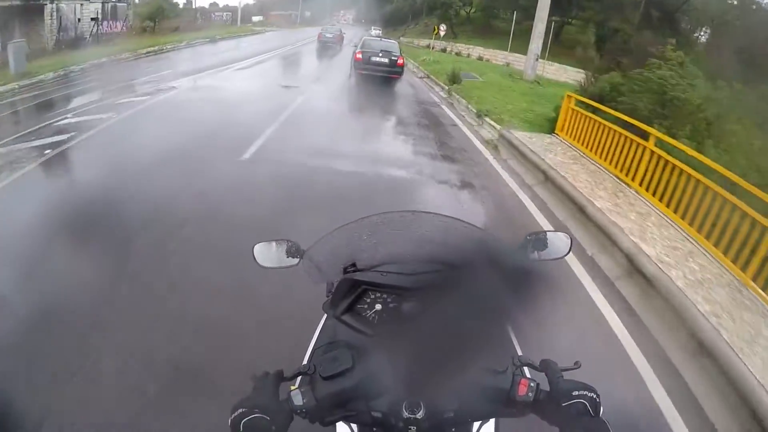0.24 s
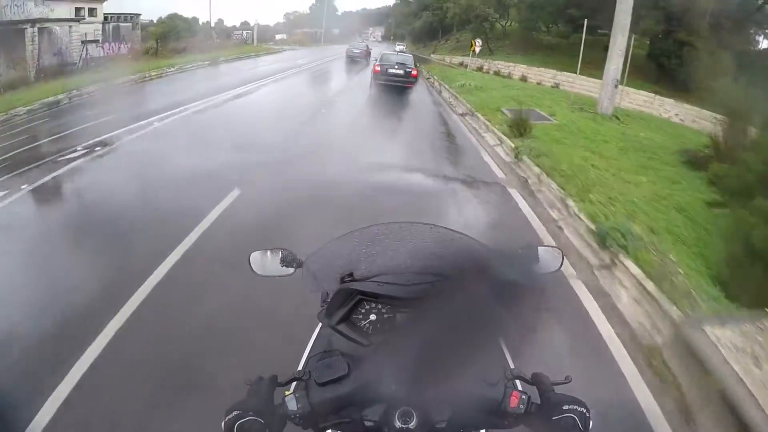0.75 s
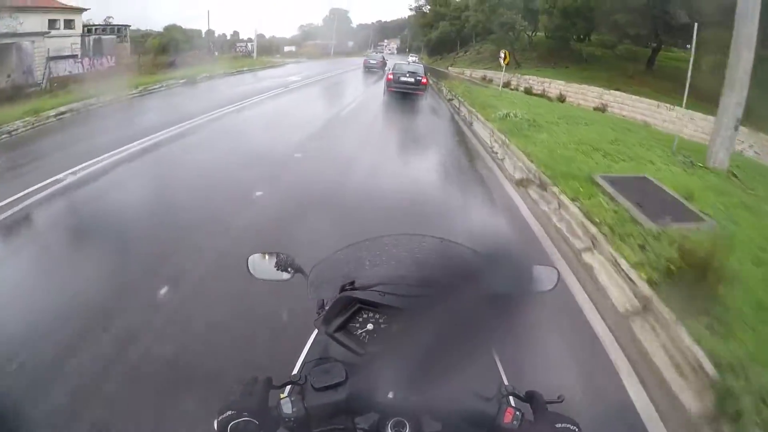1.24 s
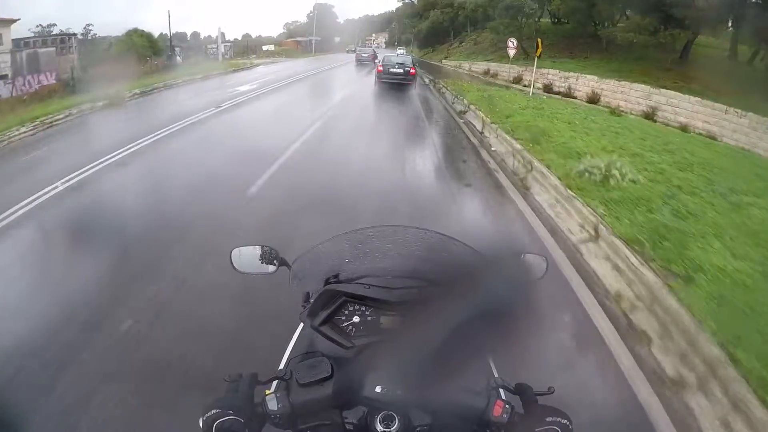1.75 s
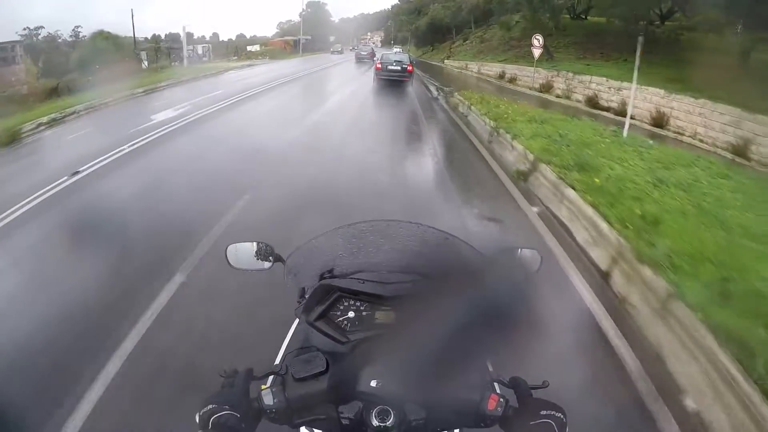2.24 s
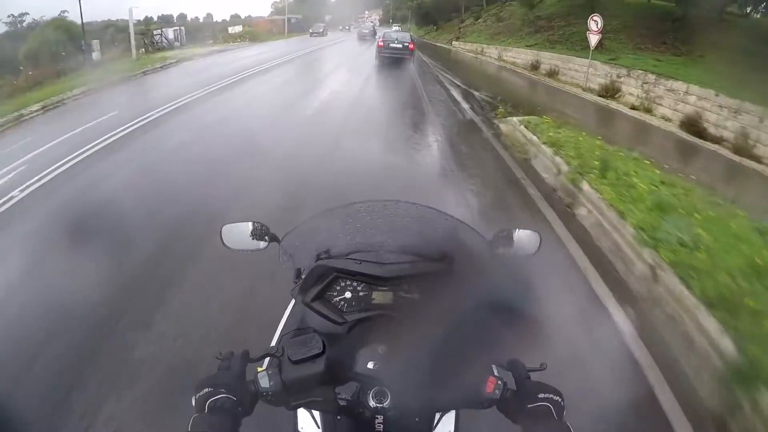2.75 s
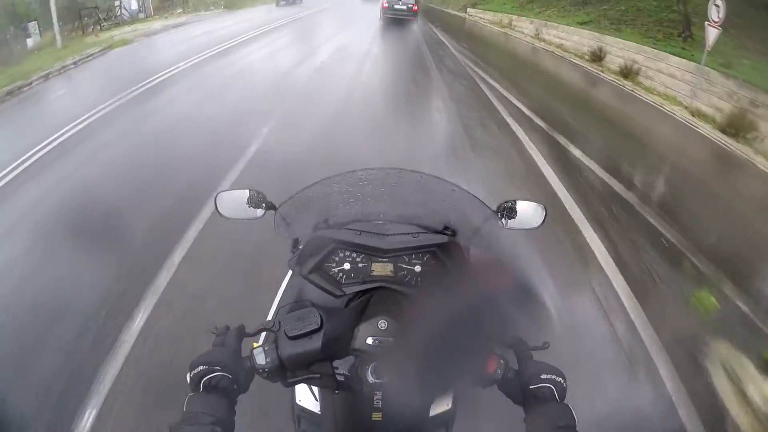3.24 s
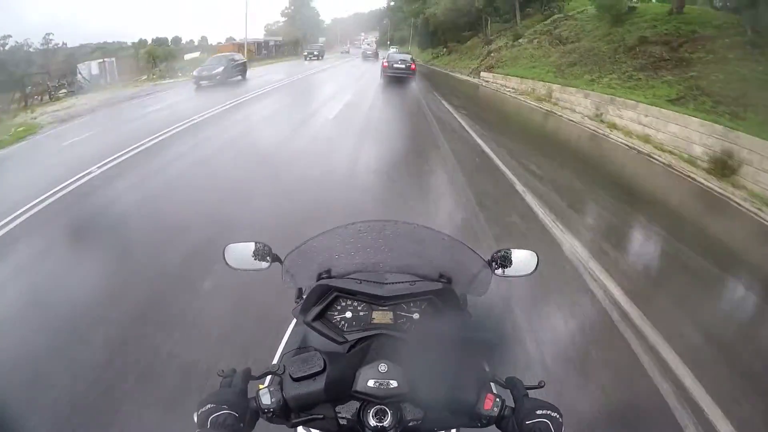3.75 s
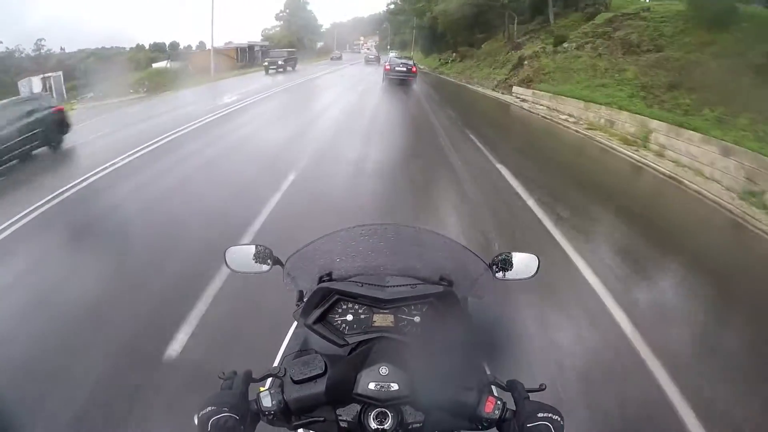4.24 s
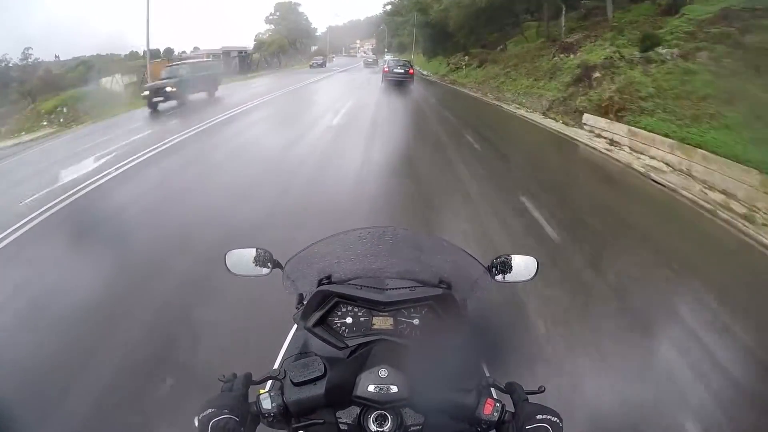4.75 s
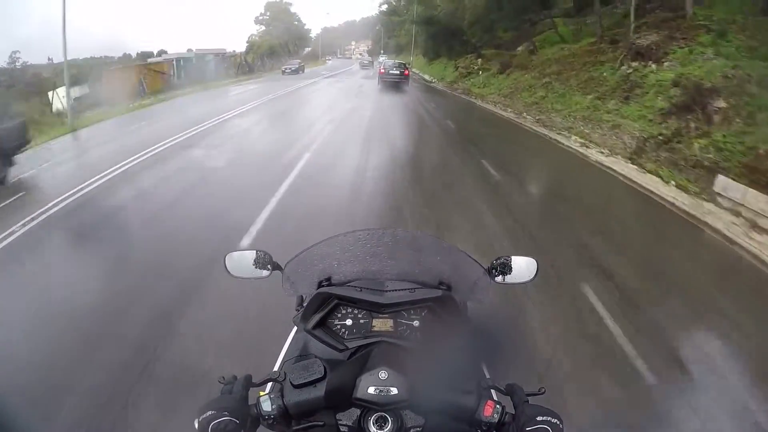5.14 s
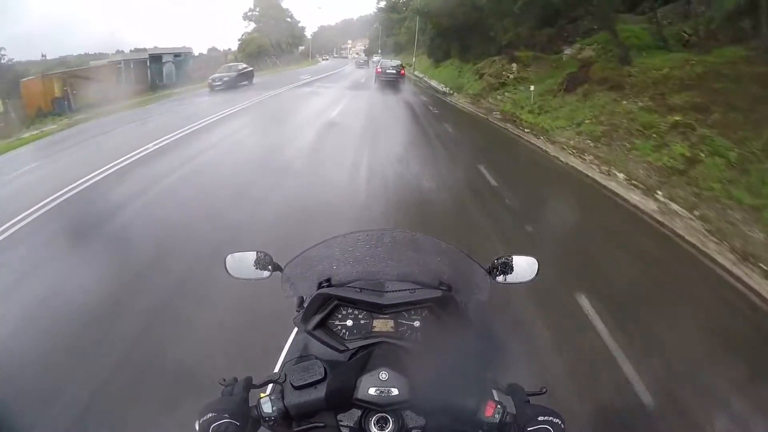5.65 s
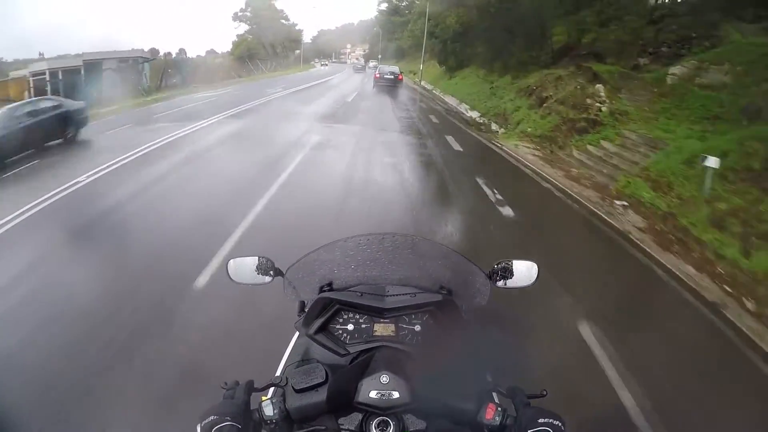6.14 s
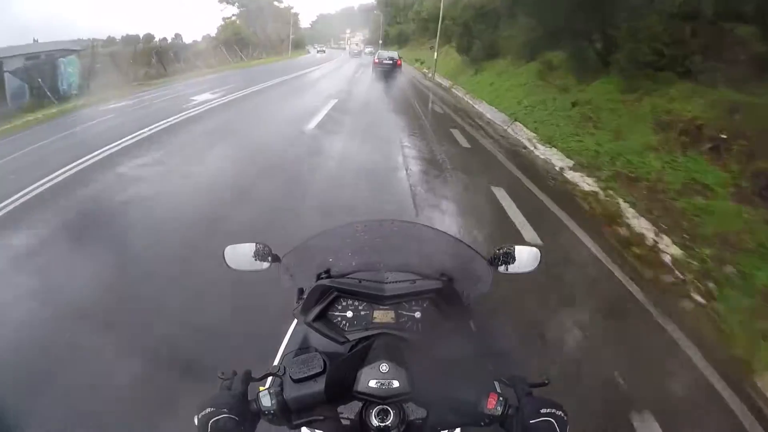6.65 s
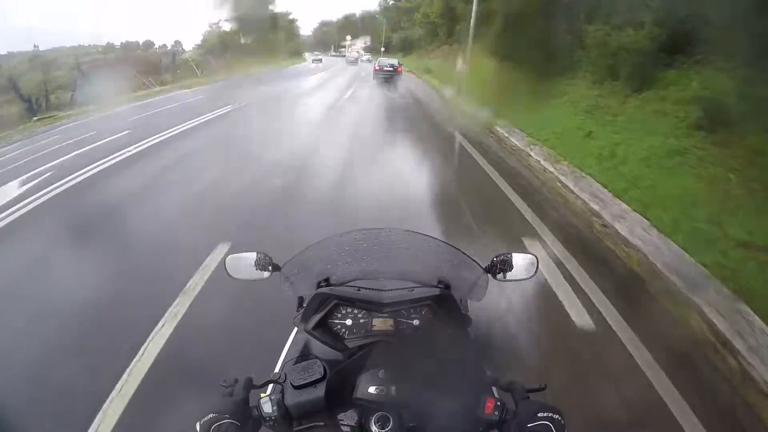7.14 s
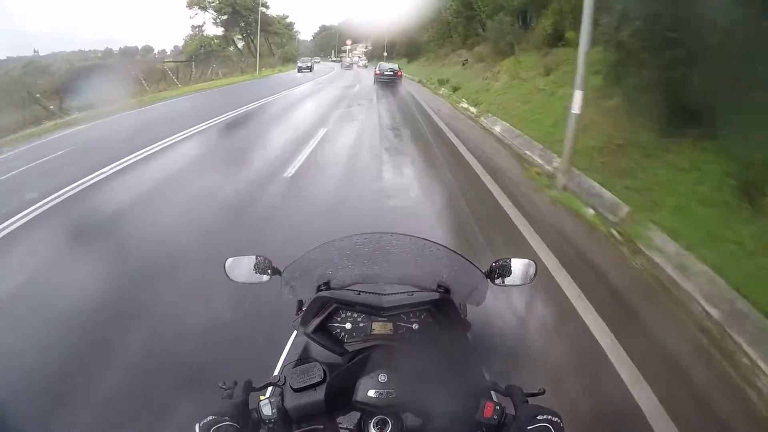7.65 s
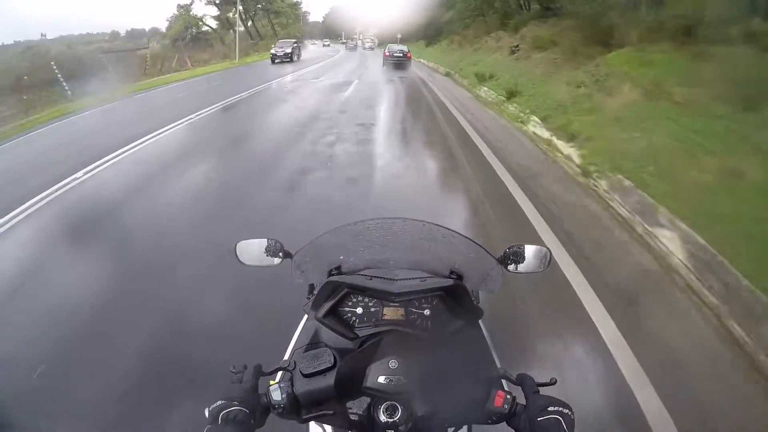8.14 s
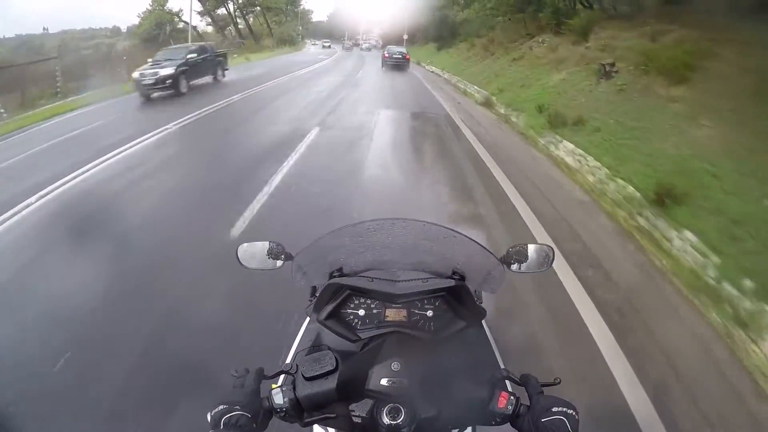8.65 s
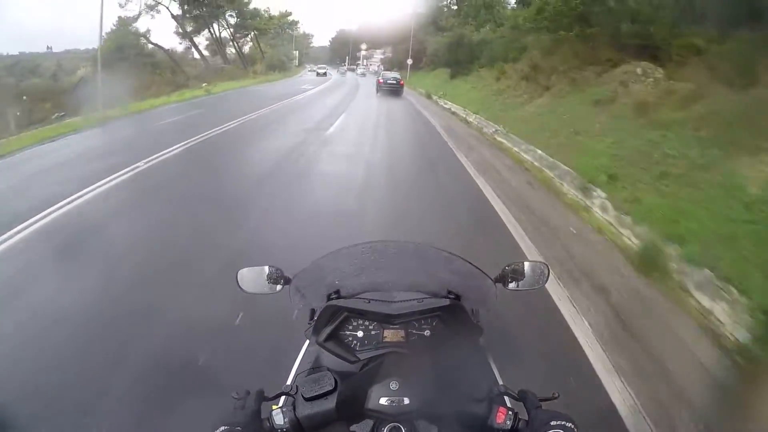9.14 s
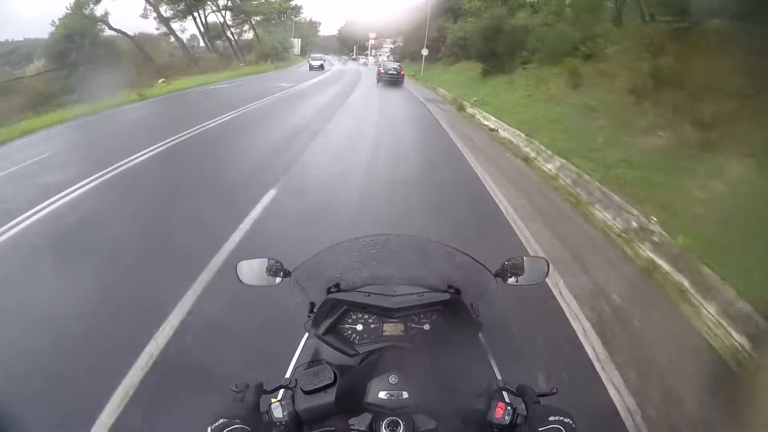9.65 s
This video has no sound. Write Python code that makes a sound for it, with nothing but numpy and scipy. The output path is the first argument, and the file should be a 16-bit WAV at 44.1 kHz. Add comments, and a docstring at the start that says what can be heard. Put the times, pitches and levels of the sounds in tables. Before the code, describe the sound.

On a rainy open road, a scooter pulls away from moderate speed to a steady cruise. Its deep drone and faint whine are gradually buried by gusty wind thumps, dull tyre roar and dense spray hiss. Irregular raindrops tap the plastic camera shell close up, and loud hits briefly push the whole sound down, with some clipping and distortion.

```python
"""A rush of wind and wet hiss swells as a scooter gathers speed in the rain; raindrops tick on a plastic shell.
The listener is a microphone in a housing on the rider's helmet. One rising airflow with gusts drives
the buffeting and the spray hiss, both made of patchy filtered noise; without the gusts it also drives the roar.
Sine orders make the engine drone and two gliding sines the drive whine; each heavy drop is a burst of noise
and decaying shell modes. Loud moments make the gain control duck, and what exceeds full scale clips."""
import sys
import numpy as np
from scipy import signal
from scipy.fft import rfft, irfft, next_fast_len
from scipy.io import wavfile
from scipy.ndimage import uniform_filter1d, minimum_filter1d, map_coordinates

SR = 44100
rng = np.random.default_rng(int(sys.argv[2]) if len(sys.argv) > 2 else 0)


def unload_audio(sound):
    """Save the sound as a 16-bit wav file, at the path given as the first command line argument."""
    columns = np.transpose(np.atleast_2d(sound))
    # keep every value between -1 and 1, then stretch to whole-number steps
    steps = np.round(np.clip(columns, -1, 1) * 32767)
    wavfile.write(sys.argv[1], SR, steps.astype(np.int16))


N = 436590


def amp(db):
    """Decibels to gain."""
    return 10 ** (np.asarray(db) / 20)


def unit(x):
    """Scale to rms 1."""
    return x / np.sqrt(np.mean(x ** 2) + 1e-20)


def curves(rows):
    """One value per sample for each column after the time."""
    s, *columns = np.transpose(rows)
    t = np.arange(N) / SR
    return [np.interp(t, s, column) for column in columns]


def wobble(rate):
    """A smooth random curve through normally distributed knots, rate knots a second."""
    coarse = np.linspace(0, N, num=N // 64)
    knots = rng.standard_normal(int(N * rate / SR) + 4)
    smooth = map_coordinates(knots, [coarse * rate / SR])
    return np.interp(np.arange(N), coarse, smooth)


def coloured(x, points):
    """x through a causal, minimum-phase filter whose gain follows (f/Hz, gain/dB) points."""
    m = 2 * next_fast_len(N // 2 + SR // 4)
    f, db = np.transpose(points)
    log_f = np.log(np.fft.rfftfreq(m, 1 / SR) + 1)
    log_gain = np.log(amp(np.interp(log_f, np.log(f), db)))
    # folding the cepstrum onto positive time makes the filter causal
    fold = np.r_[1, np.full(m // 2 - 1, 2), 1, np.zeros(m // 2 - 1)]
    cepstrum = irfft(log_gain, m) * fold
    response = np.exp(rfft(cepstrum))
    return irfft(rfft(x, m) * response, m)[:N]


def rush(points, patchy_db):
    """Turbulent noise of rms 1: its gain varies in patches of time and frequency."""
    z = signal.stft(rng.standard_normal(N), nperseg=512)[2]
    field = uniform_filter1d(rng.standard_normal(z.shape), size=7, axis=0)
    field = uniform_filter1d(field, size=12, axis=1)
    patchy = signal.istft(z * amp(patchy_db * unit(field)), nperseg=512)[1][:N]
    return unit(coloured(patchy, points))


def patter(rate, spread_db):
    """Random droplet impulses of clipped log-normal size and either sign, rate a second."""
    hits = rng.random(N) < rate / SR
    sizes = amp(spread_db * np.clip(rng.standard_normal(N), -2, 2))
    return hits * sizes * rng.choice([-1, 1], N)


def airflow():
    """Strength of the flow (dB) and the smooth gusts that add to hiss and buffeting (dB)."""
    # airflow rising with road speed: t/s, level/dB relative to cruising
    flow_course = [(0, -11.5), (.75, -10.5), (1.6, -9), (3, -6), (3.7, -6.5), (4.6, -4.5), (5.5, -2),
                   (6.3, -1.7), (7.2, 0.5), (7.9, -0.9), (9.9, -0.8)]
    # gusts (+) and lulls (-): middle t/s, length/s, hiss/dB, buffet/dB
    gusts = [(.6, 0.5, -1, -1), (1.5, 0.43, -0.5, 1.5), (1.753, 0.22, 2.5, -2), (3.3, .5, 1.5, -1),
             (3.56, 0.18, -2, -2), (3.951, .4, -1.5, 5), (4.299, 0.23, 0, -4), (4.75, .3, -1.5, -0.5),
             (5.448, 0.49, 2.5, 2.5), (5.92, 0.37, 0, -4), (7.394, 0.38, 1.5, 5), (8.058, .16, -3, -1),
             (8.2, 0.18, 2, 0.5), (8.6, 0.15, -4, -2), (9.04, 0.45, 2, 2.5), (9.24, .14, -1, 0.5),
             (9.382, 0.3, 3.5, 4.5), (9.8, 0.086, -4, 3), (9.881, .12, 3, 4)]
    flow, = curves(flow_course)
    t = np.arange(N) / SR
    hiss, buffet = np.zeros(N), np.zeros(N)
    for s, length, hiss_db, buffet_db in gusts:
        inside = np.abs(t - s) < length / 2
        swell = np.cos(np.pi * (t[inside] - s) / length) ** 2
        hiss[inside] += hiss_db * swell
        buffet[inside] += buffet_db * swell
    return flow, hiss, buffet


def swish():
    """The tyres throw water off the wet road with a smooth, high hiss."""
    # course of the swish: t/s, level/dB
    swish_course = [(0, -51), (2.6, -47.5), (3.6, -62), (9.9, -63.5)]
    # its spectrum: f/Hz, density/dB per Hz
    wet_spectrum = [(3000, -28), (4600, -0.5), (5800, -9), (7200, -3.5), (8600, -13), (9700, -7),
                    (11000, -15), (13200, -16), (15000, -26)]
    db, = curves(swish_course)
    return amp(db) * rush(wet_spectrum, patchy_db=1.3)


def drizzle(flow, prick_db=-57, tick_db=-50, growth=1.55, tick_t60=0.0053):
    """Light drops land at random, as bright pinpricks and fewer tiny splashes; speed makes them hit harder."""
    # colour of the light drops: f/Hz, gain/dB
    pinprick_colour = [(2500, -30), (6000, -1), (10000, 1), (13000, -7), (15500, -4)]
    t = np.arange(SR // 50) / SR
    decay = amp(-60 * t / tick_t60)  # tick_t60 in s
    pricks = unit(coloured(patter(rate=16, spread_db=5), pinprick_colour))
    splashes = signal.fftconvolve(patter(rate=4, spread_db=2), decay)[:N] * rng.standard_normal(N)
    ticks = unit(coloured(splashes, pinprick_colour))
    return amp(growth * flow) * (amp(prick_db) * pricks + amp(tick_db) * ticks)  # growth in dB per dB of flow


def whistle():
    """The airflow whistles hoarsely across an edge of the housing: noise in a narrow band."""
    # course of the whistle: t/s, level/dB
    whistle_course = [(1.62, -62), (1.7, -29), (1.95, -37.5), (2.95, -32), (3.07, -27.5), (3.45, -28.5),
                      (3.52, -58)]
    # its spectrum: f/Hz, density/dB per Hz
    edge_spectrum = [(1800, -32), (2260, -1), (2390, 5.5), (2520, -3), (2720, -7.5), (3350, -4),
                     (4000, -47.5)]
    db, = curves(whistle_course)
    return amp(db) * rush(edge_spectrum, patchy_db=1)


def whine(jitter=0.004, flutter_db=4.0, second_ratio=.775, second_db=-5.0):
    """The transmission sings two thin, unsteady notes; the lower one comes in as speed builds."""
    # upper note, rising with road speed: t/s, f/Hz before jitter, peak level/dB before flutter
    whine_course = [(0, 924, -50), (.62, 1006, -47), (1.3, 1100, -51.5), (1.95, 1194, -50.5),
                    (2.45, 1270, -48.5), (3.5, 1400, -52), (5, 1478, -58)]
    hz, db = curves(whine_course)
    phase = 2 * np.pi * np.cumsum(hz * (1 + jitter * wobble(40))) / SR
    speed = (hz - hz.min()) / np.ptp(hz)
    upper = amp(flutter_db * wobble(20)) * np.sin(phase)
    # second_db, relative to the upper note, holds halfway up the glide
    lower = 2 * speed * amp(second_db + flutter_db * wobble(18)) * np.sin(second_ratio * phase)
    return amp(db) * (upper + lower)


def engine(jitter=0.002, flutter_db=1.76):
    """Exhaust orders on the firing rate; the note changes colour as the engine reaches cruising speed."""
    # course of the engine: t/s, firing rate f/Hz before jitter, rms level/dB of a 0 dB order
    engine_course = [(0, 53.13, -35), (.45, 54.83, -37), (1.4, 60.5, -35), (2.2, 64.54, -33.5),
                     (3.1, 67.5, -36.5), (4.3, 68.07, -34.5), (5.4, 66.74, -32), (7, 66.45, -33),
                     (9.9, 66.25, -32.5)]
    # exhaust orders: multiple of the firing rate, pulling away level/dB, cruising level/dB
    exhaust_orders = [(1, 1, 0.5), (2, -6.5, -13), (3, -8.5, -19.5), (4, -27, -19.5), (5, -18, -20),
                      (6, -35, -25), (8, -25.5, -23), (10, -29, -22.5)]
    hz, db = curves(engine_course)
    phase = 2 * np.pi * np.cumsum(hz * (1 + jitter * wobble(14))) / SR
    cruise = ((hz - hz.min()) / np.ptp(hz)) ** 2
    drone = np.zeros(N)
    for k, pulling, cruising in exhaust_orders:
        order_db = pulling + (cruising - pulling) * cruise + flutter_db * wobble(7)
        drone += amp(order_db) * np.sin(round(k) * phase + 2 * np.pi * rng.random())
    return amp(db) * np.sqrt(2) * drone


def road(flow, level_db=-33.5, growth=0.81, draught_db=-6.0, draught_growth=0.56):
    """The dull roar of tyres, and a low draught round the helmet that grows faster with speed."""
    # tyre roar: f/Hz, density/dB per Hz
    roar_spectrum = [(90, -39), (160, -2.5), (300, -2.5), (480, -3.5), (620, -4), (820, -2.5), (990, 2.5),
                     (1250, -1.5), (1600, 2), (3000, -37.5)]
    # helmet draught: f/Hz, density/dB per Hz
    draught_spectrum = [(100, -23.5), (165, 2.5), (235, -3.5), (305, -2.5), (335, 3), (370, 2.5), (405, 1),
                        (470, -5), (800, -37)]
    # draught_db is relative to the roar; the growths are dB per dB of flow
    draught = amp(draught_db + draught_growth * flow) * rush(draught_spectrum, patchy_db=2.1)
    roar = rush(roar_spectrum, patchy_db=0.5)
    return amp(level_db + growth * flow) * (roar + draught)


def spray(flow, gust, hiss_db=-21.5, hiss_growth=1.167, fine_db=-45, fine_growth=1.2,
          grain_db=-8, flutter_db=0.88, sway_db=0.64):
    """Air and fine water hiss on the shell with a dense patter of droplets, all growing with the flow."""
    # air hiss, also the colour of the droplets: f/Hz, density/dB per Hz
    air_spectrum = [(700, -30), (1300, -24), (1520, -11.5), (1730, 0), (2000, -2.5), (2400, 1.5),
                    (2620, -1), (2700, -3.5), (2900, -1.5), (3420, 0.5), (3950, -8), (4250, -12),
                    (4480, -18), (4950, -16.5), (5300, -26.5), (8000, -63)]
    # fine water fizz: f/Hz, density/dB per Hz
    spray_spectrum = [(3500, -23), (5000, -5), (5350, 6.5), (6000, 5), (6400, 0.5), (7000, 2.5),
                      (7500, 1.5), (8200, -8.5), (8900, -10), (9600, 4), (10600, -8), (12800, -23),
                      (15000, -32)]
    flutter = gust + flutter_db * wobble(30) + sway_db * wobble(7)
    grains = unit(coloured(patter(rate=600, spread_db=10.5), air_spectrum))
    body = rush(air_spectrum, patchy_db=1.0) + amp(grain_db) * grains
    fizz = rush(spray_spectrum, patchy_db=1.2)
    hiss = amp(hiss_db + hiss_growth * flow + flutter) * body
    return hiss + amp(fine_db + fine_growth * flow + flutter) * fizz


def wind(flow, gust, level_db=-24.0, growth=1.05, lump_db=1.5, sway_db=1.56,
         steadiness=0.64, boom_db=-1, boom_growth=0.44):
    """Eddies thump on the housing; a strong flow also sets off a low, hollow boom."""
    # eddies: f/Hz, density/dB per Hz
    rumble_spectrum = [(10, -11.5), (25, 4), (48, 1), (66, -6), (88, -1.5), (104, -4), (125, -11),
                       (155, -18), (220, -38), (400, -71)]
    # hollow boom: f/Hz, density/dB per Hz
    boom_spectrum = [(45, -37.5), (72, -12), (82, 5.5), (88, 7), (95, 1), (106, -7), (160, -56)]
    db = growth * flow + gust + sway_db * wobble(8)
    boom = amp(boom_db + boom_growth * np.minimum(db, 0)) * rush(boom_spectrum, patchy_db=1.5)
    eddies = rush(rumble_spectrum, patchy_db=1.0) + boom
    # dividing by part of the slow envelope evens out the thumps
    swell = np.sqrt(np.abs(uniform_filter1d(eddies ** 2, size=SR // 8)) + 1e-9)
    steadied = unit(eddies / swell ** steadiness)
    return amp(db + level_db + lump_db * wobble(25)) * steadied


def raindrops(splash_db=1, splash_t60=0.0055, attack=0.00028):
    """Each heavy drop bursts with a bright splash and rings the spot it hits along with the whole shell."""
    # heavy drops: t/s, ring f/Hz, knock level/dB, splash level/dB before splash_db,
    # shell thud level/dB relative to the ring
    drops = [(0.331, 3460, -12.5, -34.5, -26), (0.3973, 1980, -13, -21.5, -25),
             (0.422, 4400, -27, -37, -21), (0.6327, 1490, -22, -30.5, -14), (0.6409, 4000, -25, -30.5, -26),
             (0.7343, 2120, -18.5, -44, -17), (1.0372, 3090, -21.5, -48, -20),
             (1.2583, 2200, -25, -32, -28), (2.2634, 2137, -22, -32, -30),
             (2.3048, 3760, -11.5, -18.5, -27), (2.4304, 4870, -20, -23.5, -26),
             (3.0561, 2180, -16, -45, -25), (3.27, 2940, -20, -50, -31), (3.5354, 2000, -22.5, -29, -28),
             (5.0148, 4310, -34, -27.5, -26), (5.7516, 11300, -9, -18, -28), (5.755, 3570, -14.5, -20, -24),
             (5.8415, 4260, -39, -30, -26), (5.9717, 3300, -19.5, -30.5, -26),
             (6.2772, 13500, -24, -32, -18), (7.0412, 12000, -18.5, -27, -26),
             (7.1763, 3100, -12, -21, -25), (7.4428, 1940, 2.5, -8, -23), (7.9379, 2790, -5, -14, -20),
             (8.2056, 3490, -14, -26, -26), (8.7273, 3320, -0.5, -11, -16.5), (8.8613, 4970, -22, -22, -27),
             (9.292, 4910, -26.5, -21, -26), (9.4034, 4270, -8, -22, -30), (9.8137, 8200, -22, -26, -31)]
    # modes of the shell: f/Hz, level/dB, t60/s
    shell_modes = [(1766, -16, 0.02), (2550, -13, 0.016), (3450, -12.5, 0.016), (5070, -22, 0.0074)]
    # its lowest, flexing modes: f/Hz, level/dB before each drop's thud level, t60/s
    thud_modes = [(1038, -6.5, 0.044), (1200, 5, 0.0096)]
    # colour of all knocks: f/Hz, gain/dB
    knock_colour = [(150, -19), (500, -10), (950, 0.5), (4500, 1), (7000, -19), (12000, -9)]
    # colour of all splashes: f/Hz, gain/dB
    splash_colour = [(1500, -6.5), (4500, 10), (7000, 5), (8500, 1.5), (11000, 0), (13500, -6), (15500, -7)]
    # ring time of a 0 dB knock (s); harder knocks ring longer by this power of their strength
    ring_t60, ring_growth = 0.0074, 0.14
    t = np.arange(SR // 20) / SR
    knocks, splashes = np.zeros(N + SR), np.zeros(N + SR)

    def level(x):
        """Scale to rms 1 over the first 4 ms."""
        return x / np.sqrt(np.mean(x[:SR // 250] ** 2))

    def ringing(modes):
        """Sum of decaying sines."""
        return sum(amp(db - 60 * t / t60) * np.sin(2 * np.pi * hz * t) for hz, db, t60 in modes)

    for s, hz, knock, splash, thud in drops:
        t60 = ring_t60 * amp(knock) ** ring_growth
        ring = ringing([(hz, 0, t60)]) + ringing(shell_modes) + amp(thud) * ringing(thud_modes)
        ring *= 1 - np.exp(-t / attack)  # attack in s
        burst = amp(-60 * t / splash_t60) * rng.standard_normal(len(t))
        start = round(s * SR)
        knocks[start:][:len(t)] += amp(knock) * level(ring)
        splashes[start:][:len(t)] += amp(splash + splash_db) * level(burst)
    return coloured(knocks[:N], knock_colour) + coloured(splashes[:N], splash_colour)


def scene():
    """Everything reaches the one microphone inside the housing."""
    flow, hiss_gust, buffet_gust = airflow()
    scooter = swish() + whine() + engine() + road(flow)
    air = whistle() + spray(flow, hiss_gust) + wind(flow, buffet_gust)
    rain = drizzle(flow) + raindrops()
    return (scooter + air + rain)[None]


def gain_control(x, threshold_db=-5.5, hold=0.18, release_db=12, look_ahead=0.015):
    """The gain drops just ahead of each loud moment; it holds, then climbs back at release_db a second."""
    # mean power over 4 ms; hold and look_ahead in s
    power = signal.lfilter(np.ones(SR // 250) / (SR // 250), 1, x ** 2)
    over = np.maximum(10 * np.log10(np.abs(power) + 1e-12) - threshold_db, 0)
    over = np.interp(np.arange(N) + look_ahead * SR, np.arange(N), over)
    span = 2 * int(hold * SR / 2) + 1
    held = -minimum_filter1d(-over, span, origin=span // 2)  # running maximum
    ramp = release_db * np.arange(N) / SR
    cut = np.maximum.accumulate(held + ramp) - ramp
    lag = np.exp(-1 / (.004 * SR))  # 4 ms smoothing of the cut
    return x * amp(-signal.lfilter([1 - lag], [1, -lag], cut))


def record(dry):
    """Gain control, clipping at full scale and the band limit."""
    top_hz = 15300  # middle of a 400 Hz wide slope
    clipped = np.clip(gain_control(dry[0]), -1, 1)
    m = next_fast_len(N + SR // 4)
    passband = np.clip((top_hz - np.fft.rfftfreq(m, 1 / SR)) / 400 + .5, 0, 1)
    return irfft(rfft(clipped, m) * passband, m)[None, :N]


dry = scene()
out = record(dry)
unload_audio(out)
```